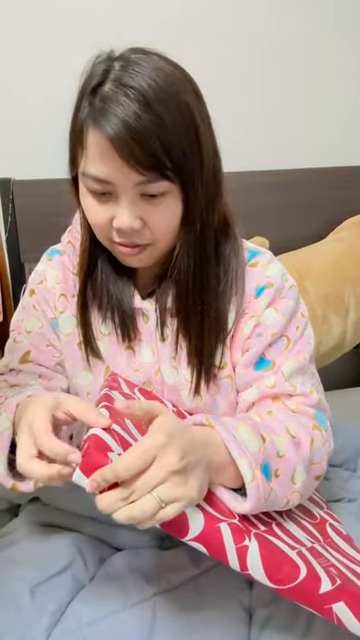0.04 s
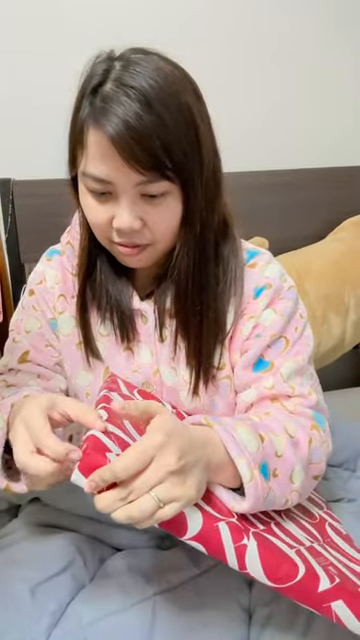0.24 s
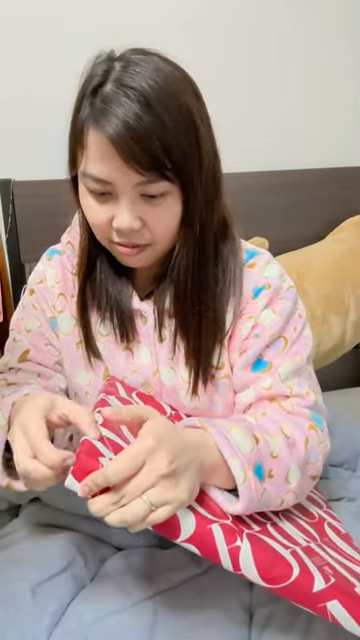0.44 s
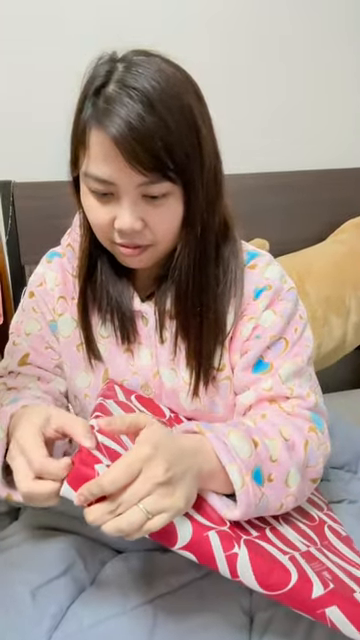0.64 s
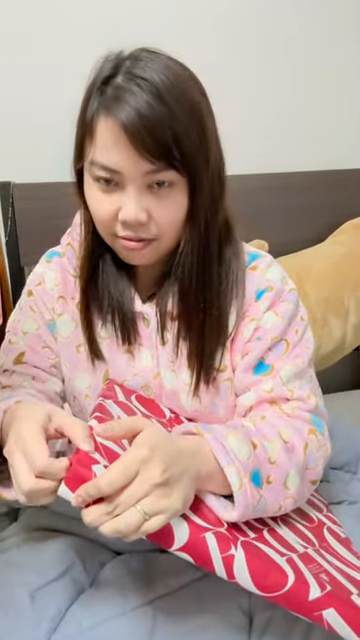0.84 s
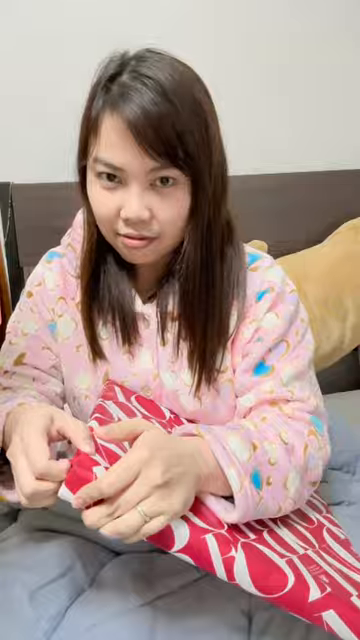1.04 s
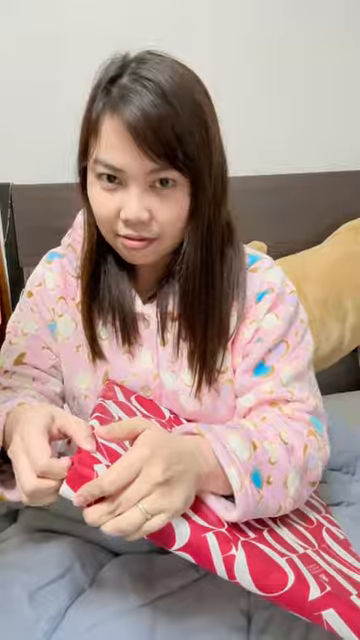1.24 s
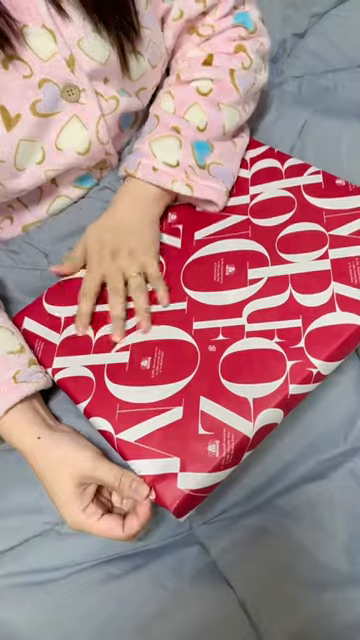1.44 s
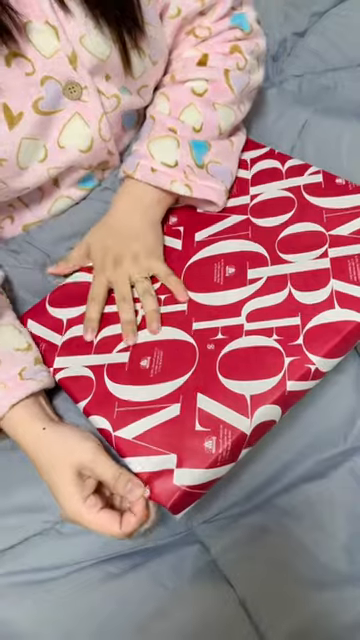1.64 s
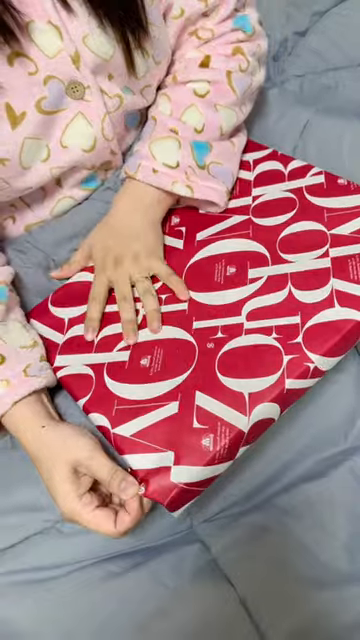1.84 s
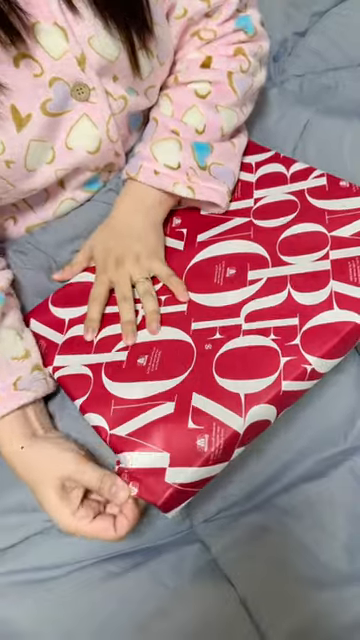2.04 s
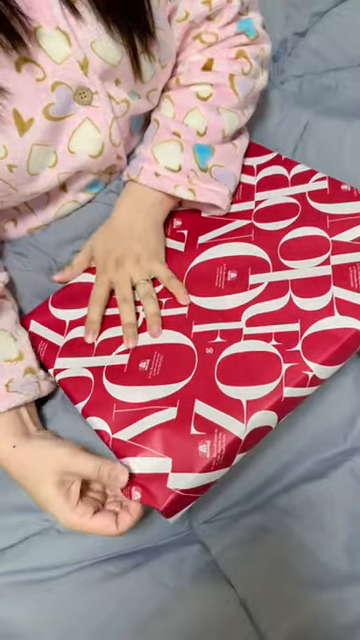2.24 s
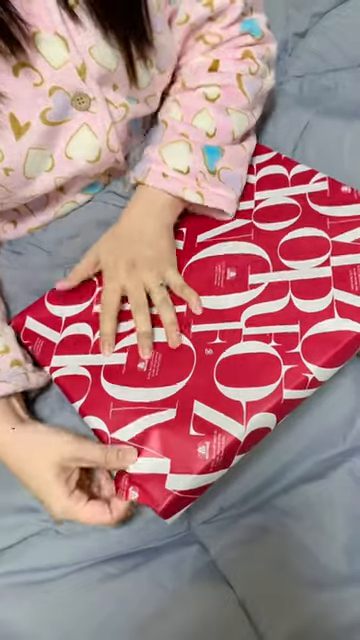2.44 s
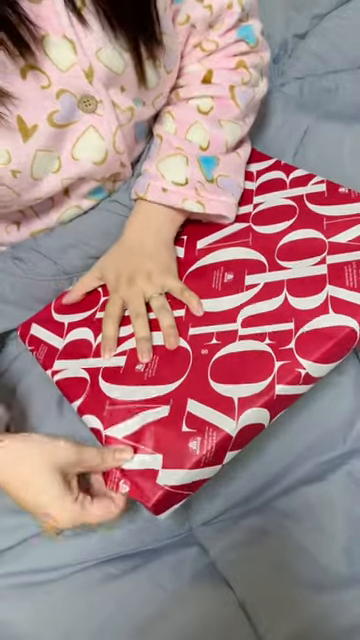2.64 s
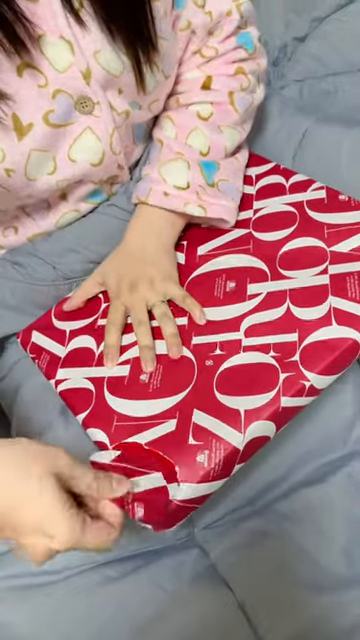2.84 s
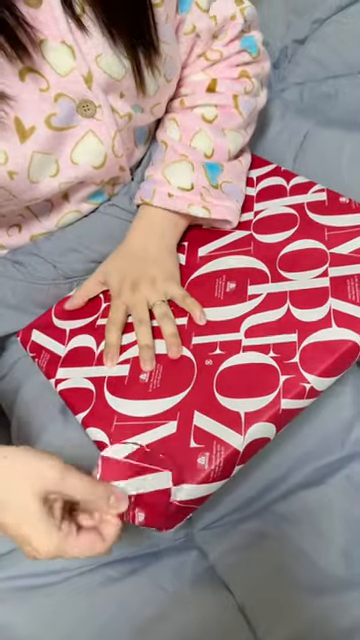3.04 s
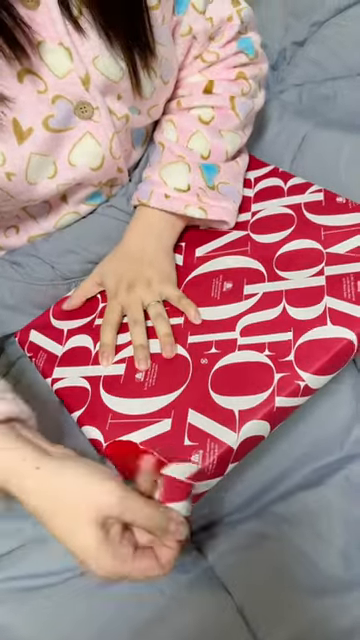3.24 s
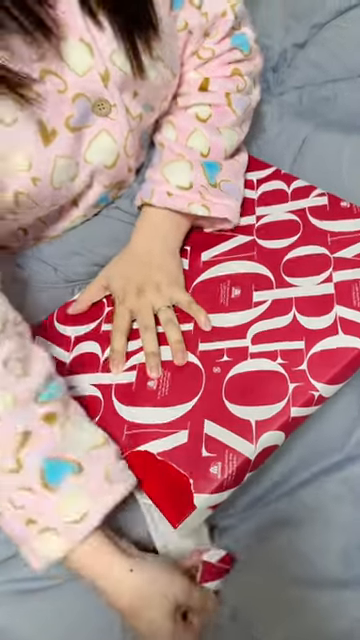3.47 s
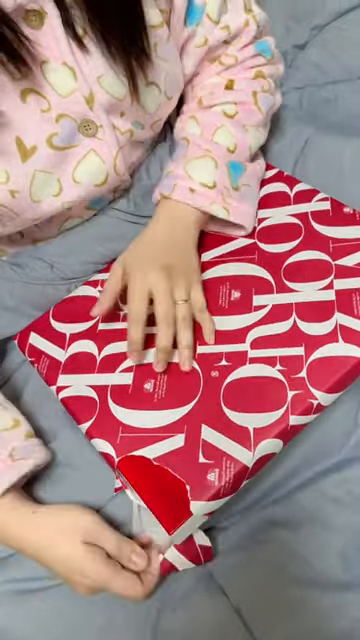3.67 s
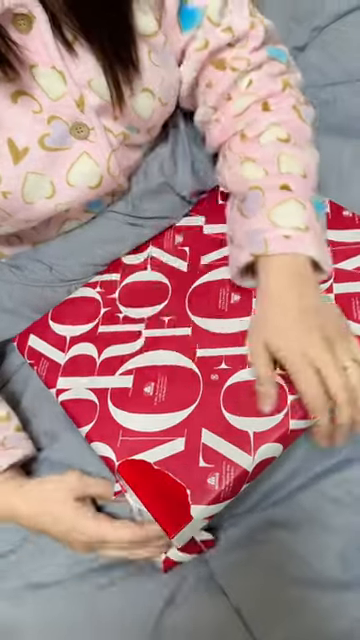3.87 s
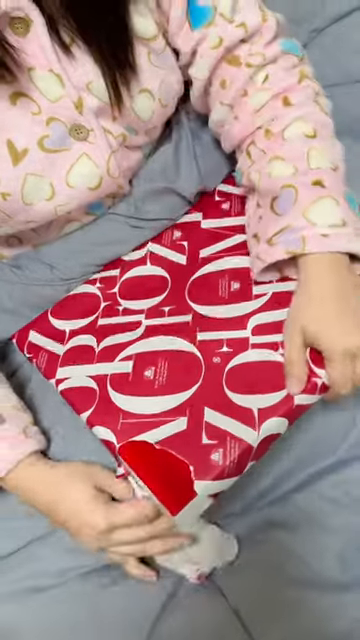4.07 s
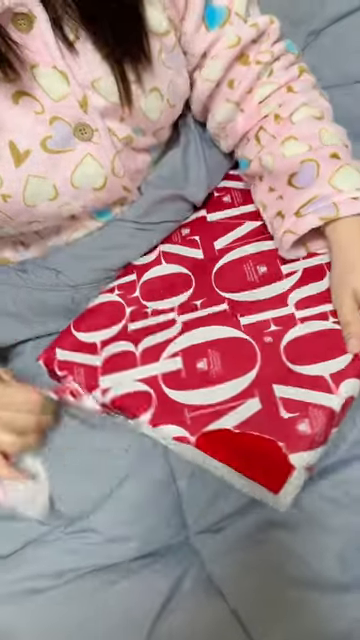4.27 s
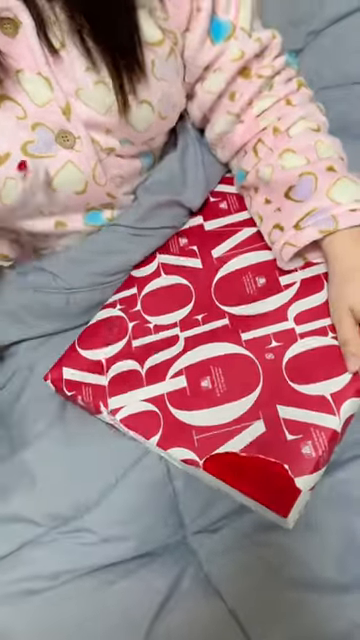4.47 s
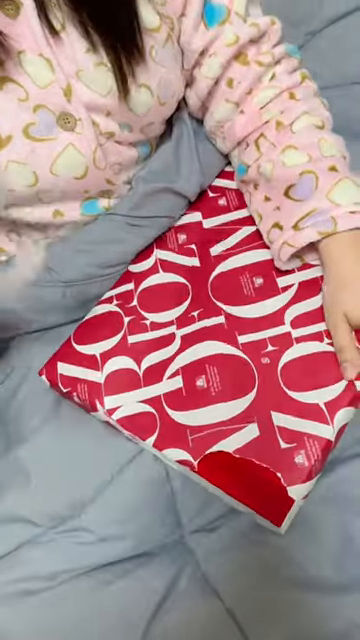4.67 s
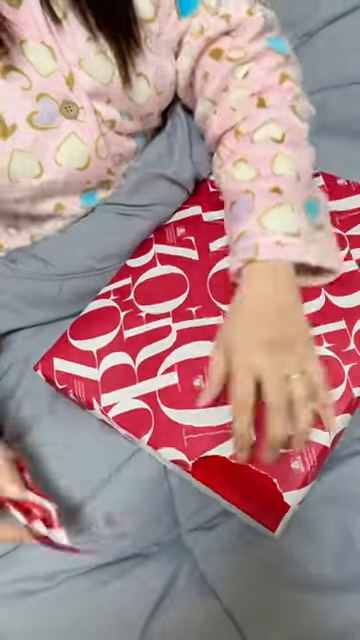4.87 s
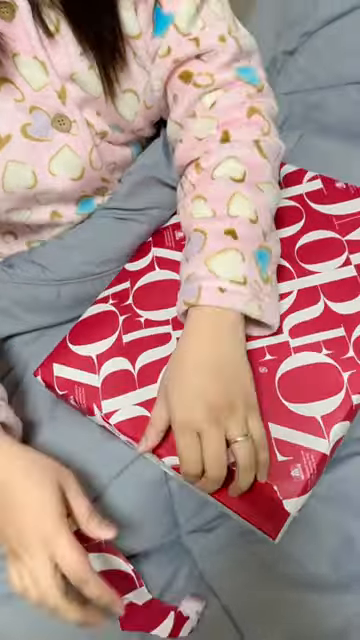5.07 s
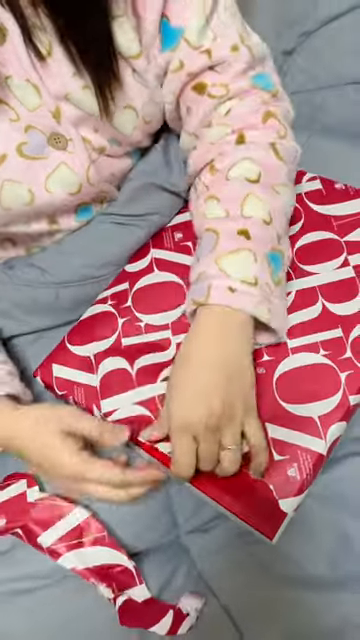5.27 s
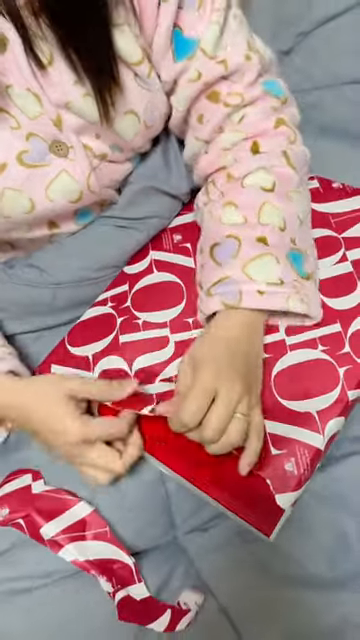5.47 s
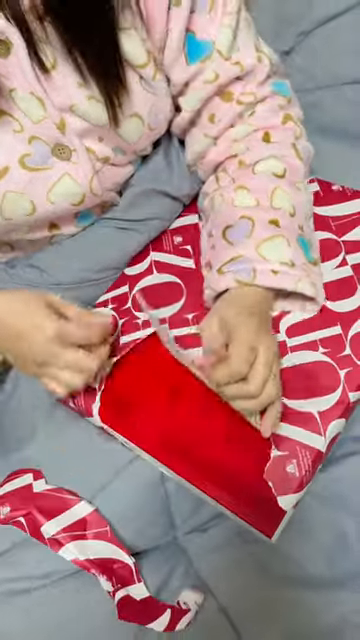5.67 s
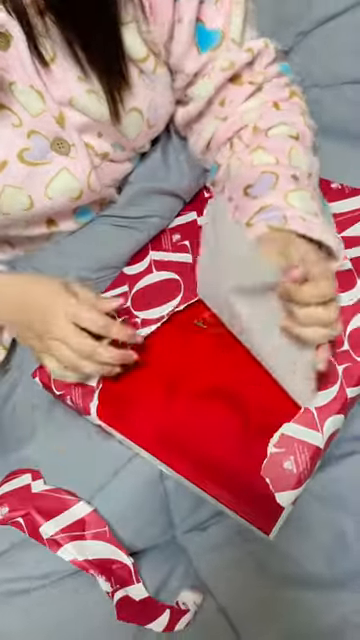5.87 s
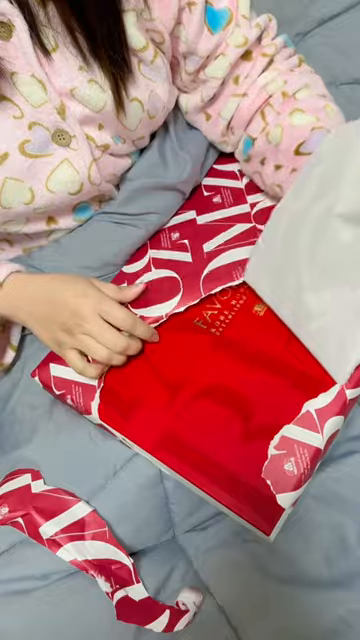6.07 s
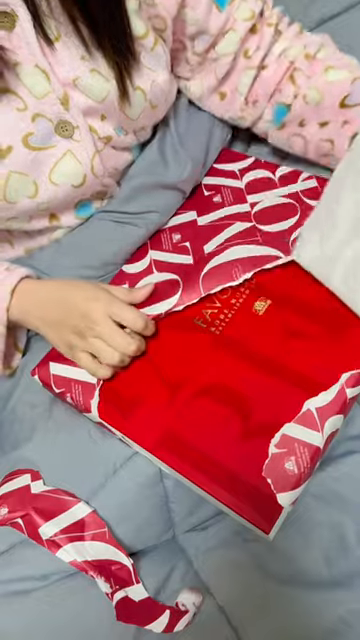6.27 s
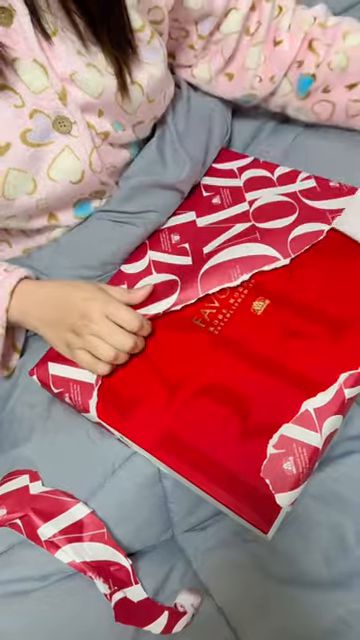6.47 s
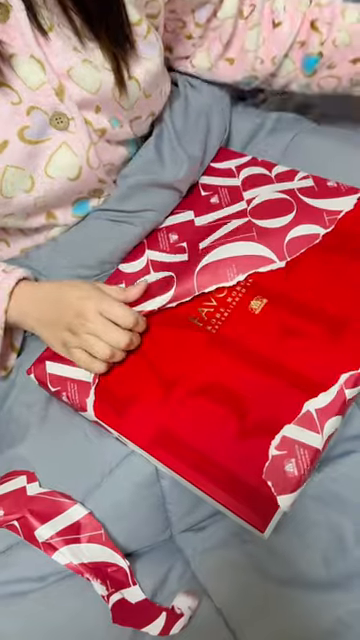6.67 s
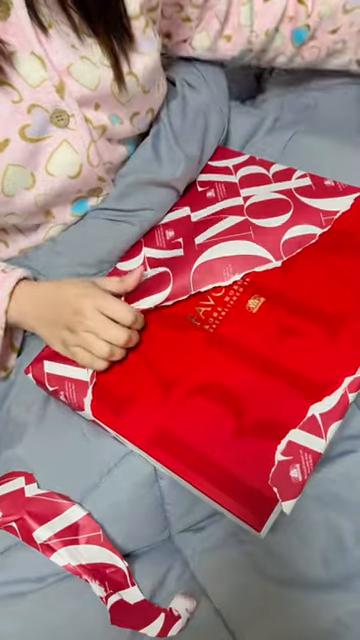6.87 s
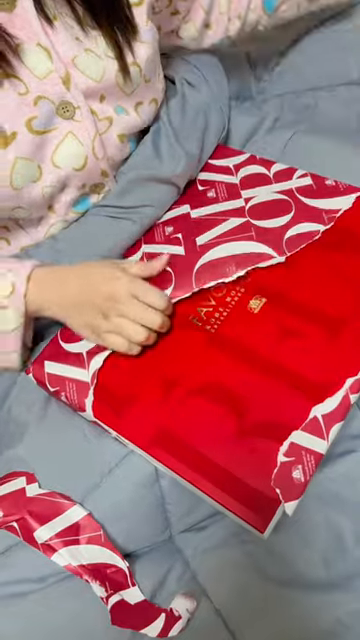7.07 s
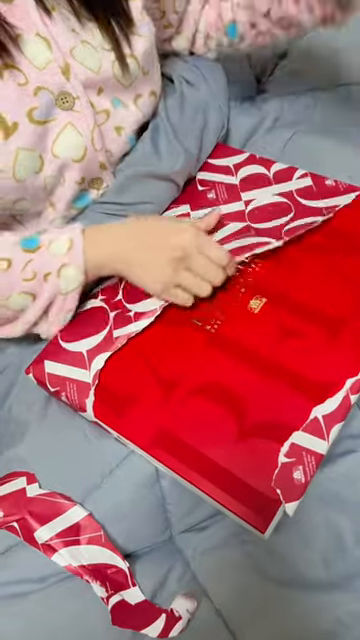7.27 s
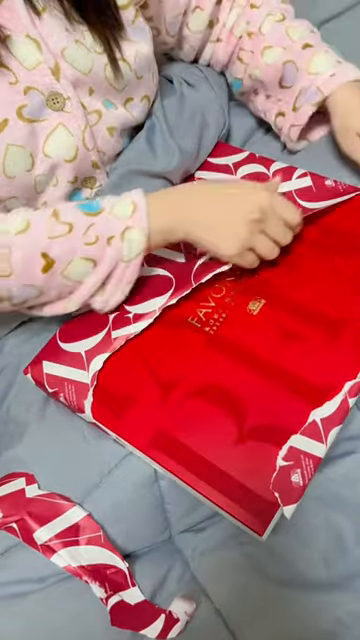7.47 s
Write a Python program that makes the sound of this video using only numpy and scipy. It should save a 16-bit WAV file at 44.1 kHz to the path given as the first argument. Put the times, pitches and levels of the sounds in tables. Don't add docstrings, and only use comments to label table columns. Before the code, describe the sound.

A quiet bedroom with a low steady hush, close stereo pickup, and soft bedding giving only a short dull tail. Faint paper handling at first, with a small crisp crunch around 0.4-0.5 s, then near stillness. At about 1.36 s the scene cuts abruptly and the hush changes slightly. Fingers pick at stiff paper with tiny ticks; sharper crackles come near 2.0 and 2.25 s. A loud, snappy rip bursts at 2.6-2.7 s with a hollow box boom. Quieter rustle follows, then tearing swells at 3.2-3.5 s and a bigger crumple and box knock around 4.2 s. Sparse crinkles and a snap near 4.8 s. A sharp snap at 5.4 s starts a long, dense, uneven tear, its loose flap ringing mid-high, lasting until 6.8 s. It stops quickly; brief quiet, then light crinkles and snaps from 7.0 to 7.5 s.

```python
import sys
import numpy as np
from scipy import signal
from scipy.fft import rfft, irfft, next_fast_len
from scipy.io import wavfile

SR = 44100
rng = np.random.default_rng(int(sys.argv[2]) if len(sys.argv) > 2 else 0)


def generate_wav(sig):
    pcm = np.round(np.clip(np.atleast_2d(sig).T, -1, 1) * 32767).astype(np.int16)
    wavfile.write(sys.argv[1], SR, pcm)


def ratio(d):
    e = np.asarray(d, float) / 20
    return 10 ** e


N = 331191
FAST = next_fast_len(N)
CHANGE_S = 1.3615
STEP = 16
SHEET_HZ = 4200

# (time [s], rustle [dB], press on the box against the rustle [dB], treble left by the shading hand [dB])
HANDLING_FIRST = [
    (0, -65.5, 9, 3),
    (0.3, -68.5, 5.5, 7.5),
    (0.6, -69, 11, 5),
    (0.77, -71, 6, 6.5),
    (0.87, -85, -10, 0),
    (1.359, -91, -5.5, -5.5),
]
HANDLING_SECOND = [(1.364, -60, -3.5, -11.5), (1.56, -62, 2, -7), (1.87, -59, -9, -2),
                   (2.16, -84.5, -10, -9), (2.4, -63, 12.5, -5.5), (2.9, -51.5, 7, -16.5),
                   (3.0, -66, 8, -26), (3.2, -73, 8, -8), (3.66, -62.5, 3.5, -1), (4.5, -69, 11.5, 4),
                   (4.6, -60, 9, -8), (4.87, -69, 8, -3), (5.09, -67.5, 12, -6), (5.26, -66.5, 15.5, 2),
                   (5.38, -67, 13, -1.5), (6.93, -83, 4, -17), (7.1, -62.5, 0, -8), (7.51, -53, -2, -10)]
# (time [s], treble [dB])
CREASE_TREBLE = [(0, 4), (1.3, 4), (1.4, 1.5), (2.7, 0.5), (2.8, -11), (3.15, -12), (3.22, 2), (3.85, 2),
                 (3.96, -2), (4.05, -7), (4.5, -6), (4.9, -5), (5.09, -17), (5.2, -3), (5.26, 4), (5.4, 0),
                 (6.95, -8), (7.05, -16), (7.51, -16)]


def rms_one(x):
    return x / np.sqrt(np.mean(x ** 2) + 1e-20)


def in_time(rows):
    s, *columns = np.transpose(rows)
    return [np.interp(np.arange(N) / SR, s, c) for c in columns]


def full_rate(control):
    return np.repeat(control, STEP)[:N]


def at_hz(points, hz, column=1):
    points = np.array(points)
    return np.interp(np.log(hz + 1), np.log(points[:, 0]), points[:, column])


def coloured(x, points):
    gain = ratio(at_hz(points, np.fft.rfftfreq(FAST, 1 / SR)))
    return irfft(rfft(x, FAST) * gain, FAST)[..., :N]


def drift(rate):
    r = np.exp(-16 * np.pi * rate / SR)
    slow = signal.lfilter([1], [1, -2 * r, r * r], rng.standard_normal(N // 8 + 2002))[2000:]
    return np.interp(np.arange(N) / 8, np.arange(len(slow)), rms_one(slow))


def ring(clicks, hz, t60):
    r, w = ratio(-60 / (t60 * SR)), 2 * np.pi * hz / SR
    return signal.lfilter([.5, 0, -.5], [1, -2 * r * np.cos(w), r * r], clicks + 1e-18)


def shaded(x, treble_db):
    dull = signal.sosfiltfilt(signal.butter(2, 5200, fs=SR, output="sos"), x)
    return dull + ratio(treble_db) * (x - dull)


def room_air():
    # (pitch [Hz], level per Hz [dB])
    air_first = [(25, -2.5), (60, 4), (130, -4.5), (350, -13.5), (1000, -17), (2100, -19), (2750, -27.5),
                 (3500, -21), (6000, -18.5), (12000, -24.5), (16000, -42)]
    # (pitch [Hz], level per Hz [dB])
    air_second = [(25, -23), (60, 13.5), (130, 0), (350, -4.5), (1000, -15), (4200, -23), (5000, -29),
                  (6000, -22), (7500, -30), (16000, -46)]
    white = rng.standard_normal((2, N))
    first = ratio(-70.5) * rms_one(coloured(white, air_first))
    second = ratio(-69) * rms_one(coloured(white, air_second))
    return first, second


def hands():
    # (crest time [s], level [dB], rise [s per 20 dB], fall [s per 20 dB],
    # press on the box against the tug [dB])
    tugs = [(0.25, -66, 0.13, 0.06, 15.5), (0.44, -47, .05, 0.12, 2), (0.496, -50.5, 0.11, 0.1648, 3),
            (0.71, -66.5, .15, 0.19, 13.5), (1.47, -66, .08, .08, 10.5), (1.595, -51.5, 0.04, 0.4, -11),
            (2.009, -40.5, 0.06, 0.06, -4.5), (2.261, -43, 0.0544, 0.12, -0.5),
            (2.47, -50, 0.1049, 0.2, 10), (2.679, -28.5, 0.0346, 0.08, 5), (3.07, -56.5, 0.03, 0.15, 16),
            (3.3, -35, 0.11, 0.16, 1), (3.398, -31.5, 0.1381, 0.085, 3), (3.488, -45, 0.03, 0.2, 9.5),
            (3.95, -51.5, .08, 0.3, 11.5), (4.155, -36, 0.09, 0.1257, 5), (4.255, -27.5, 0.14, 0.12, 5.5),
            (4.375, -34.5, 0.23, .05, -2.5), (4.79, -56.5, 0.27, 0.08, 12.5), (5.268, -52, 0.04, .1, 9),
            (5.34, -39.5, 0.0342, 0.13, -22), (6.995, -42.5, 0.04, 0.1, 5), (7.27, -44.5, .15, 0.22, -5.5),
            (7.17, -50, 0.12, 0.24, 7.5), (1.775, -51, 0.08, .06, -8.5), (2.2, -58.5, .02, 0.3, 0),
            (7.455, -47, 0.05, .1, -3), (7.385, -51, .06, 0.12, 0)]
    # (time [s], pull [dB], press on the box against the pull [dB],
    # flap pitch [Hz], flap ring [dB])
    tear = [
        (5.385, -36, -12, 3300, 5),
        (5.43, -27, -5, 3800, 12),
        (5.56, -29.5, -12, 2780, 11.5),
        (5.63, -23, -12, 2430, 10),
        (5.8, -28.5, -4, 2900, 10.5),
        (6.03, -25.5, -5, 2560, 9),
        (6.37, -27, -2.5, 2540, 12.5),
        (6.73, -27.5, -3, 2300, 9.5),
        (6.79, -44, 8, 2300, 3.5),
    ]
    # (time [s], surge [dB], half width [s], extra flap ring [dB])
    jerks = [(5.5, 2.5, 0.023, 0.5), (5.555, -4, 0.013, -1.5), (5.76, 3, 0.0089, -0.5),
             (5.78, -2, 0.024, 1.5), (5.88, 0.5, 0.018, 1), (5.94, -1.5, 0.024, 0), (6.01, 1, .015, 2),
             (6.06, 3, .01, 2.5), (6.12, -1, 0.017, -1), (6.2, -0.5, 0.016, -0.5), (6.275, 4, 0.011, -2.5),
             (6.335, 1.5, 0.017, 2), (6.43, 0.5, 0.0087, 0.5), (6.5, 1, 0.019, 2.5), (6.58, -2, .03, 0),
             (6.65, -1.5, 0.023, 0)]
    t = np.arange(0, N, STEP) / SR
    rest_db, rest_press, shade_db = [c[::STEP] for c in in_time(HANDLING_FIRST + HANDLING_SECOND)]
    pull_db, pull_press, flap_hz, flap_db = [c[::STEP] for c in in_time(tear)]
    for s, surge_db, width, flap_more_db in jerks:
        pull_db = pull_db + surge_db * np.exp(-((t - s) / width) ** 2)
        flap_db = flap_db + flap_more_db * np.exp(-((t - s) / width / 2) ** 2)
    outside = np.maximum(10 * (tear[0][0] - t), 0) + np.maximum(t - tear[-1][0], 0)
    pull = ratio(pull_db - 172 * outside)
    level = ratio(rest_db) + pull
    box = ratio(rest_db + rest_press) + pull * ratio(pull_press)
    for s, tug_db, rise, fall, tug_press in tugs:
        tug = ratio(tug_db - 20 * np.maximum((s - t) / rise, (t - s) / fall))
        level = level + tug
        box = box + tug * ratio(tug_press)
    level_db, press_db = 20 * np.log10(level), 20 * np.log10(box / level)
    tearing = pull / level
    held_db = np.where(t > CHANGE_S, -12, -1.5) - 0.41 * shade_db
    body_db = (1 - tearing) * held_db + tearing * -3.5 + 0.59 * press_db
    fine_db = (1 - tearing) * (shade_db - .3 * press_db) + tearing * -4.5
    uneven_db = 3.5 - 0.085 * (level_db + 50) + 0.55 * tearing
    return level_db, press_db, body_db, fine_db, uneven_db, flap_hz, flap_db * tearing, tearing


def crackle(per_s, cycles, clump_db, patchy_db, flap_octaves):
    # (time [s], level [dB])
    sheet_ring = [
        (5.4, 3),
        (6.28, 1.5),
        (6.34, -3),
        (6.72, -1),
    ]
    level_db, press_db, body_db, fine_db, uneven_db, flap_hz, flap_db, tearing = hands()
    rip, rip_boom = ripping()
    sheet_db, crease_db = in_time(sheet_ring)[0][::STEP], in_time(CREASE_TREBLE)[0][::STEP]
    patchy = 1 - .45 * tearing
    uneven_db = full_rate(np.clip(uneven_db, 0, 4.2))
    sizes = ratio(uneven_db * (np.minimum(rng.exponential(1, N), 4) - 2 - uneven_db / 8))
    clumps = ratio(clump_db * np.minimum(uneven_db, 2.8) * full_rate(patchy) * drift(40))
    sizes = sizes * clumps * rng.choice([-1, 1], (2, N))
    born = rng.random(N) < per_s / SR
    pitches = np.r_[np.geomspace(58, 1300, num=8), np.geomspace(1650, 6100, num=11),
                    np.geomspace(7300, 15500, num=4)]
    dealt, out = rng.integers(0, 5, N), np.zeros((2, N))
    corners = np.log([350, 1000, 2200, 5500, 9000])
    for k, hz in enumerate(pitches):
        low, body, fine = [np.interp(np.log(hz), corners, np.eye(5)[j]) for j in (0, 1, 4)]
        deep, upper = hz < 110, 4800 < hz < 11000
        pull_db = level_db + low * (press_db + 7) + body * (body_db + 6.5)
        pull_db = pull_db + deep * (-1.5 + .6 * press_db)
        rip_colour = ratio(body * -1 + upper * -3 + max(upper, fine) * crease_db)
        gain = ratio(pull_db) + low ** 2 * rip_boom + (1 - low) * rip * rip_colour
        flap_shape = 0
        for mode, share in ((1, 1), (1.64, 0.4)):
            flap_shape = flap_shape + share * np.exp(-(np.log2(hz / mode / flap_hz) / flap_octaves) ** 2)
        sheet = sheet_db * tearing * np.exp(-(np.log2(hz / SHEET_HZ) / .15) ** 2)
        wander_db = patchy_db * patchy * drift(17)[::STEP]
        wander_db = wander_db + 1.5 * tearing * drift(3)[::STEP]
        gain = full_rate(gain * ratio(fine * fine_db + flap_db * flap_shape + sheet + wander_db))
        clicks = born * (dealt == k % 5)
        t60 = cycles / hz * (3 if 1500 < hz < 6500 else 1)
        energy = np.sum(ring(np.eye(1, round(t60 * SR))[0], hz, t60) ** 2) * per_s / SR / 5
        balance = np.sqrt(hz / 3000 / energy * cycles / hz / t60)
        out += ring(clicks * sizes * gain, hz, t60) * balance
    return ratio(-5.5) * shaded(out, .6 * full_rate(np.minimum(fine_db + 9.5, 0)))


def snaps(cycles, edge, flip_s, spray_t60, bright_db, knock_cycles):
    # (time [s], peak [dB], pitch [Hz])
    dry_creases = [(1.7688, -20, 2170), (1.8607, -19, 4180), (1.9822, -17, 3000), (1.9991, -11, 2980),
                   (2.4718, -7.5, 3330), (2.6502, 0, 2800), (2.6618, 6.5, 3640), (2.7054, -3.5, 1400),
                   (2.801, -22.5, 1920), (3.0692, -22, 1970), (3.365, -14, 1950), (3.523, -17, 5790),
                   (3.5804, -23.5, 2930), (3.6053, -20, 5600), (4.0003, -25, 1540), (4.2322, -2, 2600),
                   (4.7692, -4, 2410), (5.3317, -16.5, 3060), (5.3916, 4.5, 3480), (5.4246, -14, 3560),
                   (7.196, -25, 2760), (7.2175, -20, 3600), (7.268, -17.5, 3050), (4.243, -15, 2700)]
    # (time [s], peak [dB], pitch [Hz], spray against the peak [dB])
    crunches = [(0.4190, -22, 3200, 1), (0.4423, -15, 6000, -11), (0.4684, -4, 4570, -10),
                (1.3674, -32.5, 3760, -18.5), (1.592, -34.5, 4270, 6), (1.6655, -28, 2550, -11),
                (1.8123, -37, 4300, -4), (1.955, -32, 2720, -11), (2.0214, -15.5, 2900, -12),
                (2.1825, -34.5, 3000, -10.5), (2.2309, -29, 1540, -7), (2.2557, -22, 1600, -5),
                (2.3999, -37.5, 2560, 3.5), (2.6145, -17, 4260, -5), (3.2288, -12, 3000, -5),
                (3.488, -23.5, 4290, -9), (3.7314, -26, 1580, -6), (3.846, -39, 3320, -6.5),
                (3.9455, -20, 1760, -14), (4.073, -29.5, 1420, -11), (4.1148, -25.5, 4000, -2.5),
                (4.159, -14.5, 3800, -12), (4.5462, -16, 2500, -11), (4.7058, -28.5, 2520, -10),
                (5.1592, -25, 4500, -7), (5.2659, -32.5, 3100, -7), (5.6056, -6, 2440, -6.5),
                (6.989, -21.5, 1710, -7), (7.144, -21.5, 1860, -6), (7.4252, -15, 2900, -16),
                (5.1005, -14, 3060, -8), (5.11, -16, 2380, -4.5), (7.3019, -16, 2430, -11),
                (7.3655, -15, 2330, -6), (7.3865, -18, 3500, -8), (7.4463, -16, 2500, -7),
                (7.4485, -14, 3000, -11), (3.0702, -28.5, 1040, -6.5), (2.629, -27, 3500, 0),
                (0.4018, -27, 6500, 0)]
    # (time [s], peak [dB],
    # pitch [Hz])
    ticks = [(0.714, -38, 7000), (0.781, -39, 4200), (2.55, -32, 4820), (2.5897, -33, 3410),
             (3.0344, -40, 1230), (4.0522, -42, 2650), (4.6366, -36.5, 2820), (5.03, -37, 1880),
             (5.2928, -25, 2690), (5.3186, -20, 3250), (6.8239, -32, 2330), (6.977, -34, 2500),
             (7.0845, -34, 1580), (7.254, -21, 3050), (7.285, -24, 2200), (1.374, -44, 4200),
             (1.378, -42, 4070), (1.44, -40, 4400), (1.512, -46, 2000), (1.578, -37, 4200),
             (1.5853, -37.5, 4200), (1.6, -36, 5800), (1.6357, -41, 1430), (1.748, -37, 4300),
             (1.764, -38, 2400), (1.782, -38, 2300), (1.791, -39, 2400), (1.8477, -43, 4050),
             (1.872, -34, 5000), (1.9345, -42, 2790), (2.197, -38, 2500), (2.215, -42, 2200),
             (2.267, -32, 2500), (2.8338, -40, 1230), (2.899, -33, 2480), (2.927, -42, 3000),
             (3.1404, -42, 1140), (5.256, -36, 3200), (5.28, -36, 6000), (5.299, -32, 4000),
             (5.336, -28, 3000), (5.342, -27, 3200), (7.28, -32, 5900), (7.455, -26, 2600),
             (3.593, -38, 2000), (3.635, -40, 1200), (3.873, -40, 3500), (3.928, -36, 3000),
             (4.005, -28, 2200), (4.381, -22, 4200), (4.411, -38, 9000), (4.4793, -44, 1500),
             (0.243, -46, 5000), (7.233, -34, 2500), (7.345, -36, 2600), (7.4, -34, 4200),
             (2.619, -8, 4100), (2.6225, -19.5, 1500), (3.2656, -26, 3070), (3.2781, -21.5, 2890),
              (3.33, -15, 2000), (3.397, -11, 1800), (5.4997, -7, 2950), (5.5665, -20, 2270),
              (5.5795, -14, 4170), (5.627, -6, 2600), (6.122, -14, 2500), (6.2225, -19, 2720),
              (6.3208, -18, 2700), (6.3582, -9.5, 2540), (6.418, -13.5, 2600), (6.453, -14, 2350),
              (6.499, -13, 2500), (6.7169, -14.5, 2420), (6.734, -16.5, 2500), (6.789, -25.5, 3500),
              (7.007, -23, 3800), (2.657, -5, 3200), (2.676, -6, 3300), (2.684, -6, 3400),
              (2.6925, -7, 2800), (2.712, -13, 2600), (5.106, -19, 2800), (4.605, -38, 2000),
              (4.657, -36, 2800), (4.677, -33, 1500), (4.721, -30, 2500), (4.797, -32, 2500),
              (0.4222, -11, 6000), (1.452, -41, 4400), (1.467, -41, 4300), (1.88, -38, 4300),
              (5.438, -10, 3900), (5.454, -10, 4000), (5.659, -11, 2600)]
    events = [(*row, -19, -46.5) for row in dry_creases]
    events += [(*row, -38) for row in crunches]
    events += [(*row, -12, -46.5) for row in ticks]
    hand_s, hand_treble_db = np.transpose(HANDLING_FIRST + HANDLING_SECOND)[[0, 3]]
    size = 3000
    out, t = np.zeros((2, N + size)), np.arange(size) / SR
    for s, peak_db, hz, spray_db, knock_db in events:
        shade = ratio(0.75 * min(np.interp(s, hand_s, hand_treble_db), 0) + 2.5)
        spray = rng.standard_normal((2, size)) * np.minimum(t / flip_s, 1) * ratio(-60 * t / spray_t60)
        spray = 2.0 * ring(spray, hz, 1.11 / hz) + ratio(bright_db) * shade * spray
        click = (t == 0) * rng.choice([-1, 1], (2, 1))
        ping = ring(ring(click, hz, cycles / hz), hz, cycles / hz)
        ping = ping / np.abs(ping).max()
        own = ring(click, SHEET_HZ * 1.05 ** rng.normal(), 8.0 / SHEET_HZ)
        ping = ping + (.3 if s > CHANGE_S else .08) * own
        ping = ping + 2.07 * edge * shade * np.roll(click, round(SR / hz), axis=1)
        knock_hz = rng.choice([200, 330, 550]) * 1.15 ** rng.normal()
        knock_gain = ratio(knock_db + 14 - .4 * (peak_db + 14.5))
        knock = ring(click, knock_hz, knock_cycles / knock_hz) * knock_gain
        at = round(s * SR)
        whole = .7 * ping / np.abs(ping).max() + ratio(spray_db) * spray + knock
        out[:, at:at + size] += ratio(peak_db) * whole
    return shaded(out[:, :N], *in_time(CREASE_TREBLE))


def ripping():
    # (time [s], length [s], level [dB], box boom [dB])
    rips = [(0.418, 0.04, -53, -60), (0.463, 0.029, -40, -47.5), (1.988, 0.02, -38, -28),
            (2.251, 0.012, -45.5, -44), (2.451, 0.04, -45, -24), (2.648, 0.052, -19, -10.5),
            (3.287, 0.068, -37, -30.5), (3.365, 0.034, -28.5, -17.5), (4.888, 0.02, -53, -59),
            (4.684, 0.039, -47, -45), (5.1, 0.017, -30, -41), (5.321, 0.019, -46, -52),
            (6.7, 0.056, -35.5, -31), (6.972, 0.03, -44, -52), (6.999, 0.01, -38, -42),
            (7.25, 0.021, -42, -42)]
    t, out = np.arange(0, N, STEP) / SR, 0
    for s, length, level_db, boom_db in rips:
        shape = np.clip((t - s) / 0.0019, 0, 1) * np.exp(-np.clip(t - s - length, 0, 1) / 0.0056)
        out = out + ratio([[level_db], [boom_db]]) * shape
    return out


def thumps(cycles, contact_s):
    # (time [s], peak [dB], pitch [Hz])
    box_hits = [(0.419, -38.5, 269), (0.469, -27, 1000), (1.994, -31.5, 540), (2.255, -32.5, 504),
                (2.45, -31, 206), (2.47, -34, 250), (2.265, -34, 523), (2.4, -40, 405), (1.46, -50, 250),
                (2.5, -39.5, 80), (4.2, -31.5, 75), (4.99, -44, 90), (5.262, -42, 450), (5.2, -48, 70),
                (3.033, -47, 703), (3.069, -35, 576), (3.229, -30.5, 505), (3.731, -34, 250),
                (3.943, -34, 194), (4.231, -20, 346), (4.547, -36, 592), (4.9, -52, 748), (5.02, -45, 480),
                (5.117, -39.5, 280), (5.265, -42, 136), (6.823, -45, 277), (7.005, -35.5, 205),
                (7.084, -43.5, 310), (7.365, -41, 320), (7.447, -37, 318), (2.657, -21, 190),
                (2.719, -30, 260)]
    out, touch = np.zeros((2, N + 4000)), np.exp(-np.arange(400) / SR / contact_s)
    for s, peak_db, hz in box_hits:
        knock = ring(np.pad(touch, (0, 3600)), hz, cycles / hz)
        at = round(s * SR)
        out[:, at:at + 4000] += ratio(peak_db) * knock / np.abs(knock).max()
    return out[:, :N]


def room(x):
    t60_s, level_db, dull_hz, size = 0.17, -16, 5270, 16000
    tails = []
    for _ in x:
        tail = rng.standard_normal(size) * ratio(-60 * np.arange(size) / SR / t60_s)
        tail = tail / np.sqrt(np.sum(tail ** 2))
        tails.append(signal.lfilter([1], [1, -np.exp(-2 * np.pi * dull_hz / SR)], tail))
    tails = np.pad(tails / np.sqrt(np.sum(tails[0] ** 2)), ((0, 0), (150, 0)))
    return ratio(level_db) * signal.fftconvolve(x, tails, axes=1)[:, :N]


def ports(x, table):
    hz = np.fft.rfftfreq(FAST, 1 / SR)
    turn = np.exp(1j * at_hz(table, hz)) * ratio(-at_hz(table, hz, column=2) / 2)
    straight, scattered = rfft(x, FAST)
    scattered = scattered * ratio(at_hz(table, hz, column=3))
    return irfft([straight / turn + scattered, straight * turn - scattered], FAST)[:, :N]


def scene():
    # (pitch [Hz], level per Hz [dB])
    paper_colour = [(50, -13.5), (200, -1.5), (420, -4), (1000, -1), (1900, -0.5), (2600, 1), (3300, -2),
                    (4200, 1.5), (5000, -7.5), (5900, -3.5), (7000, -7.5), (9000, -4.5), (12500, -6),
                    (15900, 2.5)]
    # (pitch [Hz], level
    # [dB])
    colour_first = [(3300, 0), (4200, -3), (5000, 3), (6200, 0)]
    # (pitch [Hz], half the phase by which left lags [rad],
    # left against right [dB], scattered side sound [dB])
    ports_first = [(200, 0, 0, -18), (1000, -.25, 1.5, -11), (2000, -.1, 0, -7), (2650, 1.05, 0, -9),
                   (3600, 0, 0, -12), (4800, .45, 0, -9), (5900, .8, 0, -9), (6900, 1.15, 0, -11),
                   (8000, 1.57, 0, -11), (9400, 2.3, 0, -11), (10600, 3.0, 0, -24), (12900, 3.3, 0, -22),
                   (13800, 4.2, 0, -12), (15300, 4.7, 0, -12)]
    ports_second = [(30, 0, 0, -18), (80, 0, 0, -19), (150, 0, 0, -28), (300, 0, 0, -12.5),
                    (400, 0, -1, -14), (700, 0, -4.5, -7), (1200, -.1, -5, -9), (1800, -.1, -2.5, -13),
                    (2700, -.4, 1.5, -4), (4100, 0, 0, -14), (4900, .3, 0, -3), (5900, .4, 0, -5),
                    (7700, .9, 0, -3), (9600, .97, 0, -6), (10400, 1.2, 0, -7), (12300, 1.5, 0, -6),
                    (13500, 1.85, 0, -5), (14100, 2.15, 0, -5), (15300, 2.3, 0, -6)]
    paper = crackle(per_s=12000, cycles=3.65, clump_db=0.756, patchy_db=3.0, flap_octaves=0.23)
    paper = paper + snaps(cycles=4, edge=0.22, flip_s=0.0012, spray_t60=0.015, bright_db=-2.0, knock_cycles=5)
    paper = paper + ratio(3.5) * thumps(cycles=12.0, contact_s=.0006)
    paper = coloured(paper, paper_colour)
    paper = paper + room(paper)
    air_first, air_second = room_air()
    since_change = np.arange(N) / SR - CHANGE_S
    fade_out = np.clip(-since_change / .003 - 1, 0, 1)
    fade_in = np.clip(since_change / .002 - 1.5, 0, 1)
    first = ports(coloured(paper, colour_first) + air_first, ports_first)
    second = ports(paper + air_second, ports_second)
    return fade_out * first + fade_in * second


def low_pass(x):
    return signal.sosfilt(signal.butter(12, 16970, fs=SR, output="sos"), x)


def record(dry):
    rounded = np.tanh(dry)
    mix = signal.sosfilt(signal.ellip(6, 1, 22, 15800, fs=SR, output="sos"), rounded)
    return low_pass(mix)


dry = scene()
out = record(dry)
generate_wav(out)
```